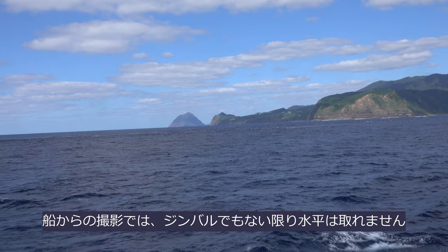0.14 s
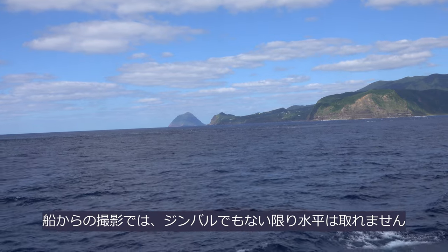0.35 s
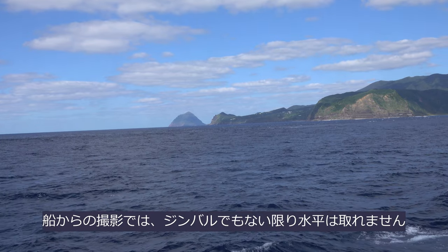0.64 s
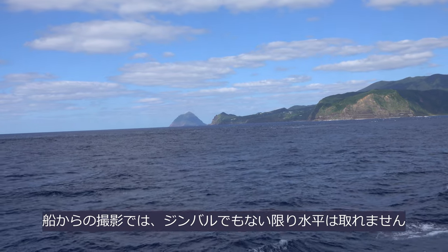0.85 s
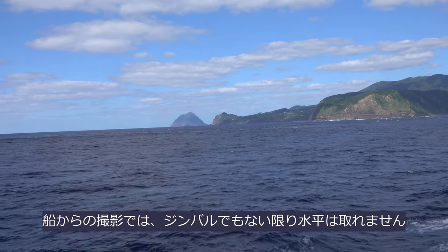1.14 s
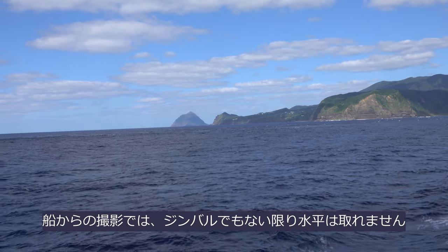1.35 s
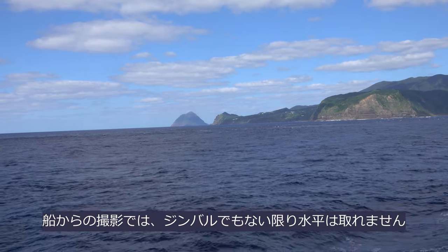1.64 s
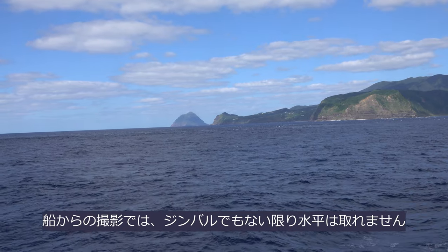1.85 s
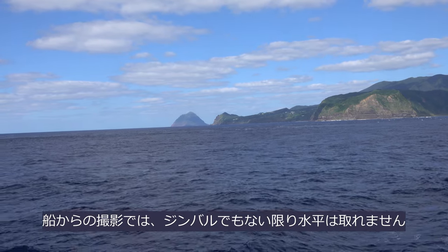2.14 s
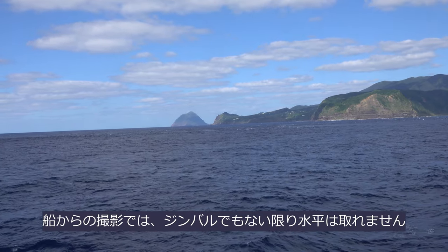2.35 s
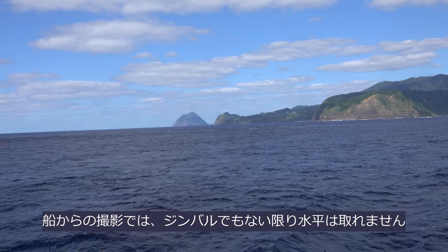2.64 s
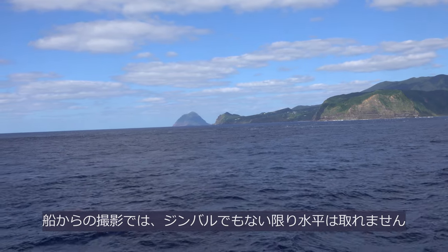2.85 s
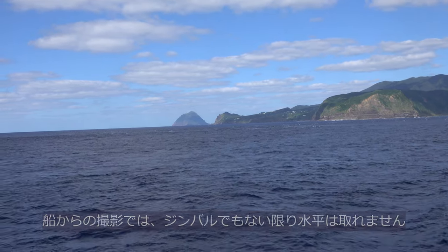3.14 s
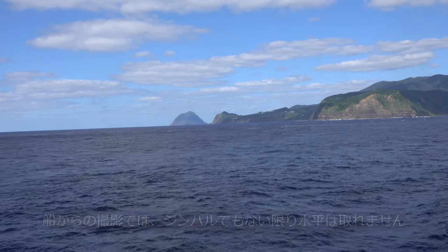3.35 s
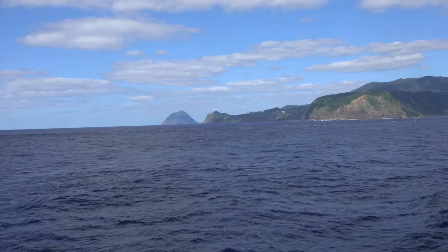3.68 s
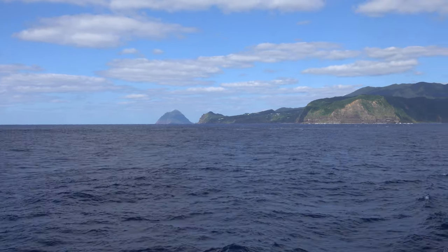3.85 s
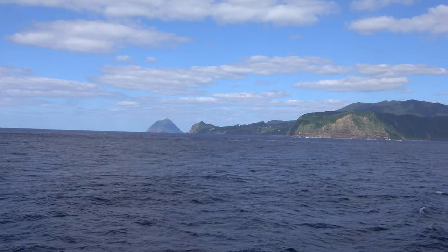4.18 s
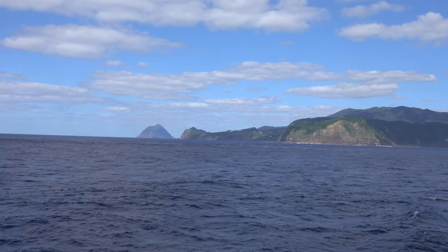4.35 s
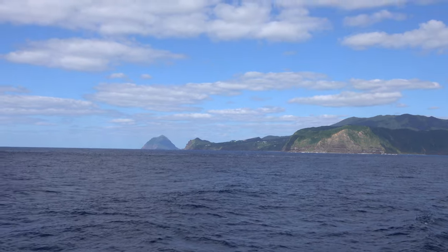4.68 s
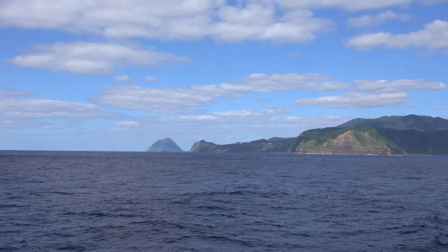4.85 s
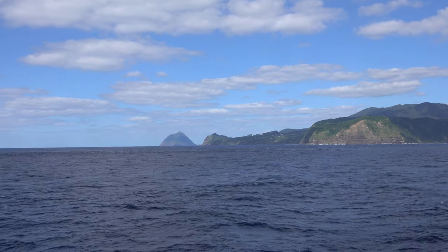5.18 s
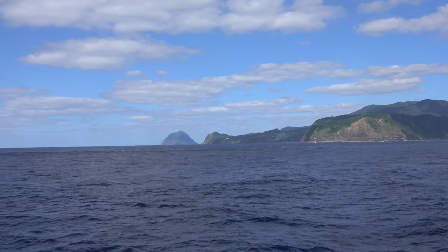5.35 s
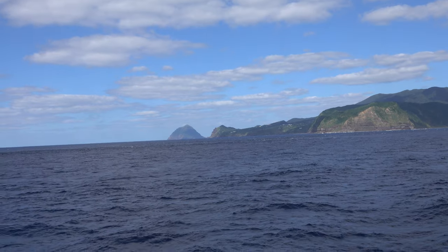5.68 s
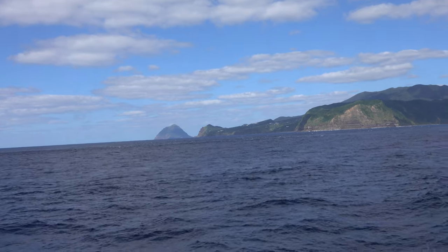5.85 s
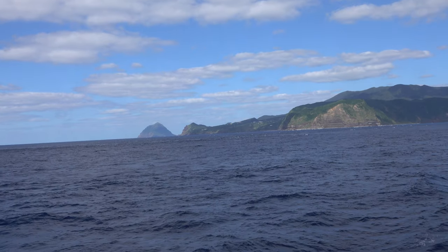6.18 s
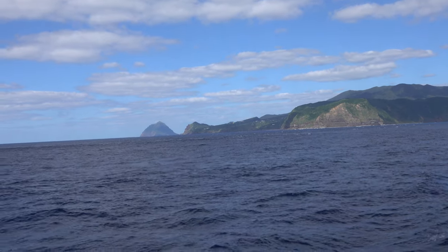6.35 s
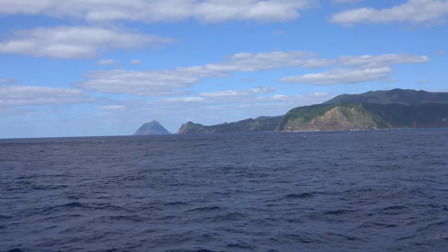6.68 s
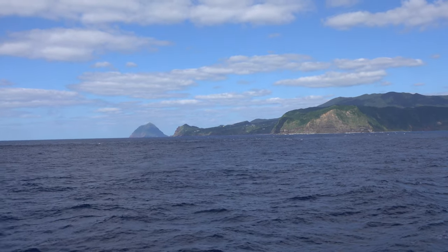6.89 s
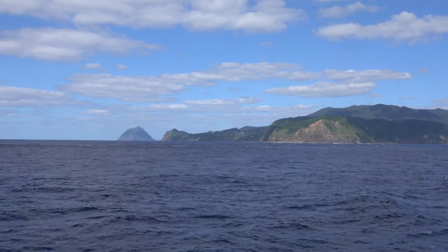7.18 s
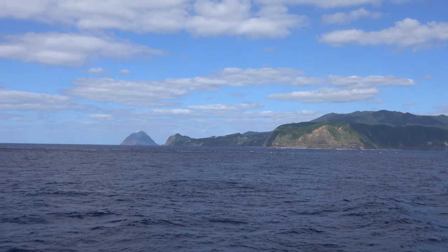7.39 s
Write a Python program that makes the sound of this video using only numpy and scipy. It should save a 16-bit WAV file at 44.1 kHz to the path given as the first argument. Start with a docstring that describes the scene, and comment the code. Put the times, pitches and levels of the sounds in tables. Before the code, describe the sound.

From 0 to 7.5 seconds a large marine diesel drones without a break, heard from the open deck: a dense, low, throbbing hum centred near 100 to 140 hertz, wrapped in a dull exhaust roar with slightly ringing metal plates. Its pitch sags a hair until about 3.5 seconds, then recovers by 5; the tones swell a little around 3.75. Fainter steady hums from generator and pumps sit underneath. Quiet bow wash and fine fizzing spray run throughout, lifting in small soft splashes near 0.9, 1.7, 3.0, 3.3, 3.9 and 4.6. Very low wind rumble wavers on the microphone. At 6.5 a tiny high droplet ticks, barely noticeable. At 6.9 a wave gives the hull a soft, deep thump, ringing for about half a second with a stronger wind buffet. The drone continues to the end, mono, with faint hiss.

```python
"""A ferry's main diesel drones through hull and funnel, heard on the open deck: tones at multiples of its cycle,
swaying in speed with the swell, over a roar of filtered noise. A generator set and pumps hum as steady sines.
The bow wave washes and fizzes as patchy noise, with brief splashes and one droplet; one wave thumps the hull
into decaying low tones, wind buffets the microphone as low noise, and a faint hiss lies behind it all."""
import sys
import numpy as np
from scipy import signal
from scipy.fft import rfft, irfft, next_fast_len
from scipy.io import wavfile
from scipy.ndimage import uniform_filter1d, map_coordinates

SR = 44100
rng = np.random.default_rng(int(sys.argv[2]) if len(sys.argv) > 2 else 0)


def magnitude_from_level(level_db):
    """Linear magnitude for a level in decibels (20 dB per decade)."""
    exponent = np.asarray(level_db, float) / 20
    return 10 ** exponent


def transcribe(u):
    """Save the signal u as a 16-bit wav file named by the first command-line argument.

    u: samples, shape (n,) or (channels, n), limited to [-1, 1]; the rate is SR.
    q: integer samples, one column per channel.
    """
    v = np.clip(np.atleast_2d(u).T, -1, 1)
    q = np.round(v * 32767).astype(np.int16)
    wavfile.write(sys.argv[1], SR, q)


N = 331632  # length in samples

# Colour of the faint hiss. Each row: frequency in Hz, relative density in dB per Hz.
HISS_SPECTRUM = [(2000, -4), (5000, -2), (9000, 1.5), (12000, -1), (16000, -2.5)]
# Generator set and pumps at governed speed. Each row: frequency in Hz, level in dB rms before it wavers.
AUXILIARY_HUMS = [(33.29, -53), (89.59, -41), (179.18, -43), (254.73, -51), (328.51, -52), (382.83, -57),
                  (462.75, -51), (657, -59), (13936, -90)]
# Colour of the wind buffeting. Each row: frequency in Hz, relative density in dB per Hz.
BUFFET_SPECTRUM = [(6, -14), (14, -6), (22, 0), (38, 0), (50, -7), (70, -22), (120, -62)]
# Wind on the microphone. Each row: time in seconds, level in dB rms.
WIND_LEVEL = [(0, -54), (1.2, -56), (1.45, -48), (1.8, -51), (3.2, -46), (4.6, -50), (5.7, -46), (6.7, -47),
              (6.92, -39), (7.2, -41), (7.52, -52)]
# The bow wave swells and sinks. Each row: time in seconds, wash in dB rms, spray in dB rms, both before splashes.
BOW_WAVE_LEVELS = [(0, -49.5, -59.5), (0.7, -52, -65), (1.45, -51.5, -63), (1.8, -51, -61.5),
                   (2.45, -52, -63.5), (2.9, -49, -60), (3.6, -49.5, -61.5), (4.05, -49.5, -61),
                   (4.45, -51, -61), (4.95, -49, -60), (5.4, -51.5, -62.5), (7.1, -51, -61.5),
                   (7.52, -50.5, -63)]
# Colour of the wash. Each row: frequency in Hz, relative density in dB per Hz.
WASH_SPECTRUM = [(500, -33), (1000, -8), (1700, 2), (2100, -3), (2800, -4.5), (4000, -12.5), (6000, -28),
                 (9000, -48)]
# Colour of the spray. Each row: frequency in Hz, relative density in dB per Hz.
SPRAY_SPECTRUM = [(2000, -32), (3500, 0.5), (5000, 4), (6500, 2.5), (8500, -3.5), (11000, -26),
                  (15000, -30)]
# Crests that break into spray. Each row: time of the peak in seconds, lift of the spray over the bow wave in dB.
SPLASHES = [(0.92, 2.5), (1.7, 3.5), (2.95, 1.5), (3.29, 2), (3.87, 2.5), (4.62, 1.5)]
# A droplet landing near. Each row: start in seconds, starting amplitude in dB.
DROPLETS = [(6.5111, -45)]
# A wave thumps the hull. Each row: start in seconds, gain on the hull's ring in dB.
THUMPS = [(6.895, -19)]
# Low modes the hull rings with. Each row: frequency in Hz, relative level in dB, time to fall by 60 dB in seconds.
HULL_MODES = [(30, -10, .8), (91, -1, 0.37), (124.3, -0.5, 0.59)]
# Main engine speed. Each row: time in seconds, four-stroke cycles per second in Hz.
ENGINE_SPEED = [(0, 5.884), (1, 5.863), (2, 5.835), (3.05, 5.792), (3.55, 5.782), (4, 5.797), (4.5, 5.83),
                (5.1, 5.854), (5.5, 5.852), (6.1, 5.834), (7.52, 5.818)]
# How hard the engine works, rising when the swell slows it. Each row: time in seconds, gain on the tones in dB.
ENGINE_LOAD = [(0, -0.5), (3.2, -0.4), (3.75, 2), (4.4, 0), (6.5, 0.3), (7.52, -1)]
# Uneven cylinders sound many multiples of the cycle. Each row: multiple, level in dB rms before load and wavering.
CYCLE_ORDERS = [(6, -52.7), (7, -53.1), (11, -53.7), (12, -44.2), (13, -54.1), (14, -43.4), (17, -31.1),
                (18, -32.0), (19, -34.1), (20, -43.0), (21, -38.5), (22, -35.1), (23, -34.3), (24, -39.8),
                (25, -40.9), (27, -45.7), (28, -44.8), (29, -37.4), (34, -50.5), (38, -42.6), (39, -47.8),
                (42, -48.4), (44, -48.9), (46, -46.9), (47, -54.3), (51, -46.4), (52, -55.1), (55, -53.6),
                (57, -54.6), (60, -58.4), (61, -55.1), (66, -58.3), (72, -56.2)]
# Exhaust and plating roar between the tones. Each row: frequency in Hz, relative density in dB per Hz.
ROAR_SPECTRUM = [(20, -58), (52, -28), (66, -16.5), (100, 0), (140, -3), (200, -8), (270, -11),
                 (340, -19.5), (400, -20), (500, -21.5), (550, -24.5), (850, -24.5), (940, -28.5),
                 (1300, -32), (2500, -58), (5000, -69)]
# Deck plates and vents that the roar excites. Each row: frequency in Hz, width in Hz, boost in dB.
PLATE_RESONANCES = [(250, 30, 3), (355, 15, 3), (440, 40, 5), (505, 35, 3), (600, 28, 5.5), (658, 34, 6),
                    (780, 40, 2), (825, 30, 4), (1012, 28, 6), (1075, 40, 2), (1160, 60, 2)]


def unit(x):
    """Scales a signal to rms 1."""
    return x / np.sqrt(np.mean(x ** 2) + 1e-20)


def curves(rows):
    """Draws straight lines between rows: one value per sample for each column after the time."""
    seconds, *columns = np.transpose(rows)
    return [np.interp(np.arange(N) / SR, seconds, column) for column in columns]


def wobble(rate):
    """A smooth random curve through `rate` knots a second."""
    knots = rng.standard_normal(int(N * rate / SR) + 4)
    return map_coordinates(knots, [np.arange(N) * rate / SR])


def coloured(x, spectrum, peaks=()):
    """Filters x through a spectrum and bell-shaped resonances, then scales it to rms 1."""
    size = next_fast_len(N + 8192)
    hz = np.fft.rfftfreq(size, 1 / SR)
    points_hz, points_db = np.transpose(spectrum)
    gain_db = np.interp(np.log(hz + 1), np.log(points_hz + 1), points_db, left=-120, right=-120)
    for centre_hz, width_hz, boost_db in peaks:
        gain_db += boost_db / (1 + (2 * (hz - centre_hz) / width_hz) ** 2)
    return unit(irfft(rfft(x, size) * magnitude_from_level(gain_db), size)[:N])


def patchy(depth_db):
    """White noise with patches of random gain in time and frequency."""
    bins = signal.stft(rng.standard_normal(N + 512), nperseg=512)[2]
    patches = uniform_filter1d(rng.standard_normal(bins.shape), size=8, axis=0)  # across frequency
    patches = uniform_filter1d(patches, size=12, axis=1)  # across time
    return signal.istft(bins * magnitude_from_level(depth_db * unit(patches)), nperseg=512)[1][:N]


def far_hiss():
    """A faint, even hiss of filtered white noise."""
    return magnitude_from_level(-62) * coloured(rng.standard_normal(N), HISS_SPECTRUM)


def auxiliaries():
    """Machines at governed speed hum at fixed pitches that waver slowly in level."""
    t = np.arange(N) / SR
    hums = np.zeros(N)
    for hz, db in AUXILIARY_HUMS:
        level = np.sqrt(2) * magnitude_from_level(db + 2.76 * wobble(1.55))
        hums += level * np.sin(2 * np.pi * (hz * t + rng.random()))
    return hums


def wind():
    """Slow lumps of pressure on the microphone: low noise with a random swell."""
    lumps = magnitude_from_level(1.2 * wobble(8.4)) * coloured(rng.standard_normal(N), BUFFET_SPECTRUM)
    return magnitude_from_level(curves(WIND_LEVEL)[0]) * unit(lumps)


def droplets():
    """A droplet's tick: a roughened high tone that dies within milliseconds."""
    taps = np.zeros(N)
    t = np.arange(400) / SR
    for start, db in DROPLETS:
        phase = 2 * np.pi * 6800 * t + 1.2 * rng.standard_normal(len(t))  # random phase roughens the tone
        taps[round(start * SR):][:len(t)] += magnitude_from_level(db - 60 * t / .012) * np.sin(phase)
    return taps


def splash_lift():
    """Breaking crests lift the bow wave in short bell-shaped swells, in dB."""
    rise_s, fall_s = 0.048, 0.055
    t = np.arange(N) / SR
    lift_db = np.zeros(N)
    for peak, db in SPLASHES:
        spread_s = np.where(t < peak, rise_s, fall_s)
        lift_db += db * np.exp(-((t - peak) / spread_s) ** 2)
    return lift_db


def spray_fizz():
    """A dense fizz of bursting bubbles of unlike sizes: patchy noise mixed with random clicks, at rms 1."""
    happens = rng.random(N) < .05  # chance of a burst at each sample
    bursts = happens * magnitude_from_level(1.5 * rng.exponential(size=N)) * rng.standard_normal(N)
    bed = coloured(patchy(depth_db=0.5), SPRAY_SPECTRUM)
    return unit(bed + .45 * coloured(bursts, SPRAY_SPECTRUM))


def bow_wave():
    """Patchy wash along the hull under fizzing spray, both lifted by the splashes."""
    wash_db, spray_db = curves(BOW_WAVE_LEVELS)
    lift_db = splash_lift()
    wash_share = 0.3  # part of a splash's dB that the wash takes
    wash = magnitude_from_level(wash_db + wash_share * lift_db) * coloured(patchy(depth_db=0.48), WASH_SPECTRUM)
    return wash + magnitude_from_level(spray_db + lift_db) * spray_fizz()


def hull_thump():
    """A soft blow from a wave sets the low hull modes ringing."""
    out = np.zeros(N + SR)
    t = np.arange(SR) / SR
    ring = sum(magnitude_from_level(db - 60 * t / t60) * np.sin(2 * np.pi * hz * t) for hz, db, t60 in HULL_MODES)
    soft_onset = 1 - np.exp(-t / .012)
    for start, db in THUMPS:
        out[round(start * SR):][:SR] += magnitude_from_level(db) * soft_onset * ring
    return out[:N]


def engine_tones():
    """Uneven cylinders sound tones locked to multiples of the four-stroke cycle."""
    cycle_phase = 2 * np.pi * np.cumsum(curves(ENGINE_SPEED)[0]) / SR
    stagger = .467  # share of a cycle between neighbouring multiples: throbs several times a cycle, not once
    tones = np.zeros(N)
    for order, db in CYCLE_ORDERS:
        path_shift = .3 * wobble(1.5)  # radians: the path through the hull shifts a little
        phase = order * cycle_phase + np.pi * stagger * order ** 2 + path_shift
        tones += np.sqrt(2) * magnitude_from_level(db + 0.64 * wobble(0.85)) * np.sin(phase)
    return tones


def engine_roar():
    """Exhaust and plating roar as patchy noise that rings the deck plates and vents."""
    level = magnitude_from_level(-27.5 + 0.87 * wobble(3.23))
    return level * coloured(patchy(depth_db=0.4), ROAR_SPECTRUM, PLATE_RESONANCES)


def main_engine():
    """Load drives the tones fully and the roar by a small share of its dB."""
    load_db = curves(ENGINE_LOAD)[0]
    return magnitude_from_level(load_db) * engine_tones() + magnitude_from_level(0.16 * load_db) * engine_roar()


def scene():
    """Everything adds up at one microphone on deck."""
    background = far_hiss() + auxiliaries() + wind()
    water = droplets() + bow_wave() + hull_thump()
    return (background + water + main_engine())[None]


def roll_off(x):
    """The treble ends steeply here."""
    return signal.sosfilt(signal.butter(12, 15710, fs=SR, output="sos"), x)


def record(dry):
    """Delivers the finished mono mix."""
    return roll_off(dry)


dry = scene()
out = record(dry)
transcribe(out)
```